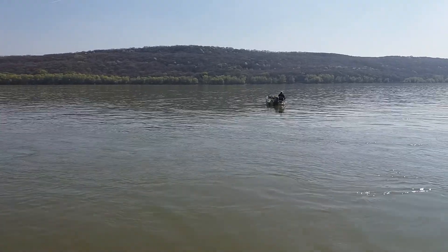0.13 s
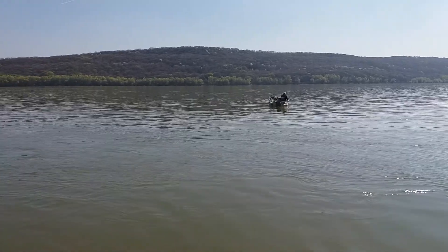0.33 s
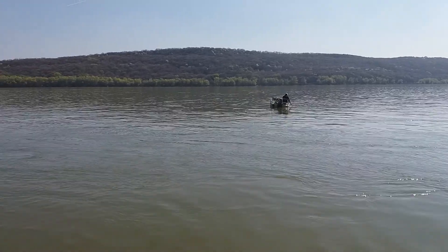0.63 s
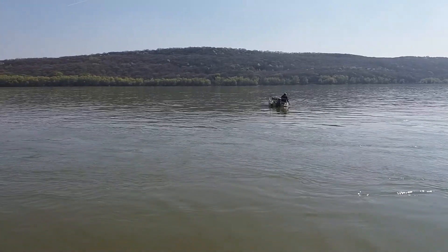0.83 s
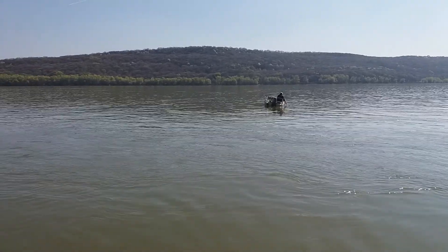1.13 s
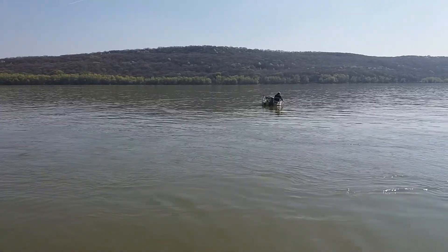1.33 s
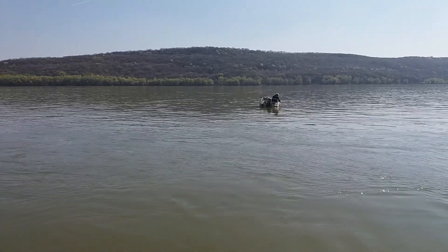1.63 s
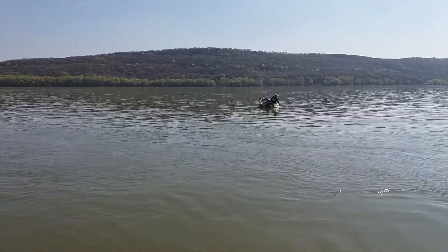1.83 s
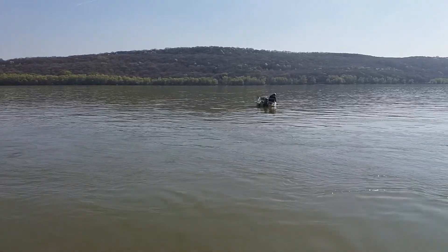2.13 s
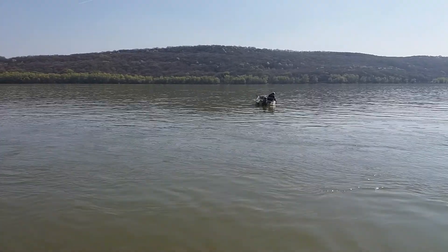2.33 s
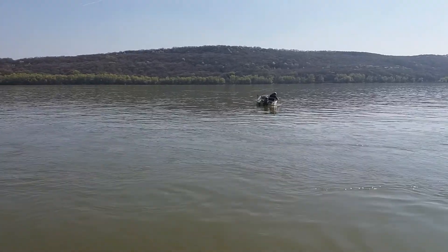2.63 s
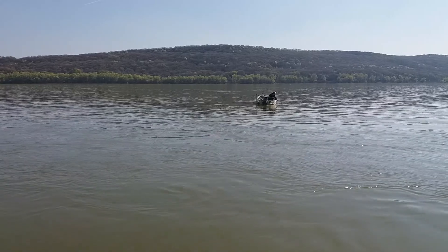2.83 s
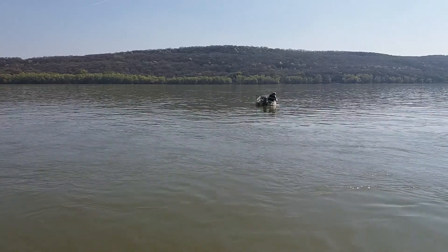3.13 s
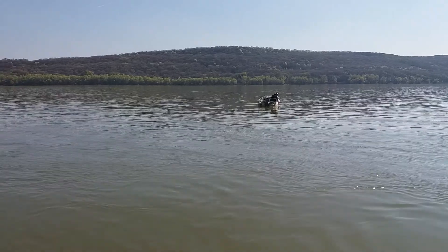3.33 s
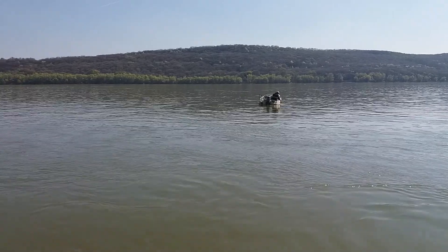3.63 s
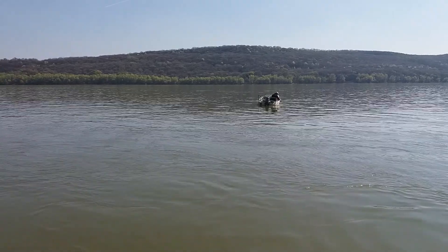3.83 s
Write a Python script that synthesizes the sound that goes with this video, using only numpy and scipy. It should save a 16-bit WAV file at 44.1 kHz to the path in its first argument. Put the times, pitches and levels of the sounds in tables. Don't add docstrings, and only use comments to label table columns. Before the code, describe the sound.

Quiet open river with faint low buzzing pulses and tiny drips; a distant finch starts singing, then two deep watery plops ring out and echo. Afterwards small bubbles crackle near the microphone, with slight hiss.

```python
import sys
import numpy as np
from scipy import signal
from scipy.fft import rfft, irfft, next_fast_len
from scipy.io import wavfile
from scipy.ndimage import map_coordinates

SR = 44100
rng = np.random.default_rng(int(sys.argv[2]) if len(sys.argv) > 2 else 0)


def nominal_scale(level):
    x = np.asarray(level, float) / 20
    return 10 ** x


def unload_wav(signal):
    wavfile.write(
        sys.argv[1],
        SR,
        np.round(np.clip(np.atleast_2d(signal).T, -1, 1) * 32767).astype(np.int16),
    )


N = 176400


def unit(x):
    return x / np.sqrt(np.mean(x ** 2) + 1e-20)


def along(points, hz):
    f, value = np.transpose(points)
    return np.interp(np.log(hz + 1), np.log(f + 1), value)


def wobble(rate):
    knots = rng.standard_normal(int(N * rate / SR) + 4)
    return map_coordinates(knots, [np.arange(N) * rate / SR])


def filtered(x, response):
    size = next_fast_len(len(x) + SR // 2)
    spectrum = rfft(x, size) * response(np.fft.rfftfreq(size, 1 / SR))
    return irfft(spectrum, size)[:len(x)]


def noise(spectrum, size):
    return unit(filtered(rng.standard_normal(size), lambda hz: nominal_scale(along(spectrum, hz))))


def add(track, s, sound):
    part = track[max(round(s * SR), 0):][:len(sound)]
    part += sound[:len(part)]


# f/Hz, time to fall 60 dB [s]
VALLEY_RING = [(100, 1.4), (300, 1.97), (1000, 2.4), (4000, 3.3), (10000, 0.24)]


def tail(x, start_s, dryness=1):
    hz, t, z = signal.stft(rng.standard_normal(int(1.5 * SR)), SR, nperseg=1024)
    fade = nominal_scale(-60 * dryness * t / along(VALLEY_RING, hz)[:, None])
    reply = signal.istft(z * fade, SR, nperseg=1024)[1]
    delayed = np.pad(x, (int(start_s * SR), 0))
    return signal.fftconvolve(delayed, reply / np.linalg.norm(reply))[:N]


def air_pocket(start_hz, end_hz, db, length, attack, steep):
    glide_s = 0.013
    t = np.arange(SR // 10) / SR
    turns = end_hz * t - (end_hz - start_hz) * glide_s * (1 - np.exp(-t / glide_s))
    swell = (1 - np.exp(-t / attack)) * np.exp(-(t / length) ** steep)
    return nominal_scale(db) * swell * np.sin(2 * np.pi * turns)


# t/s, start f/Hz, end f/Hz, peak level/dB, length/s
POCKETS = [
    (1.9469, 266, 338, -14.5, 0.0056),
    (3.1199, 190, 350, -19, 0.012),
]
# attack/s, steepness of the fade, push (negative opens with suction)
POCKET_ATTACK_S = [0.0023, 0.00076]
POCKET_STEEP = [2.47, 2.3]
POCKET_PUSH = [-1.04, 0.84]
# t/s, start f/Hz, end f/Hz, peak level/dB, length/s
HEAVES = [
    (1.9332, 89.5, 156, -24, 0.0231),
    (3.1175, 139, 149, -29, 0.012),
]
HEAVE_ATTACK_S = [0.023, 0.0028]
# t/s, start f/Hz, end f/Hz, peak level/dB, length/s
BUBBLES = [
    (1.955, 346, 431, -24.5, 0.011),
    (3.139, 315, 481, -31.5, 0.013),
]
# t/s, start f/Hz, end f/Hz, peak level/dB, length/s
SIDE_BUBBLES = [
    (1.949, 870, 1070, -43.5, 0.0064),
    (3.1198, 874, 800, -31, .011),
    (1.931, 1040, 2260, -38, 0.0038),
    (3.107, 450, 610, -42, 0.0028),
]
# t/s, crack level/dB, spray level/dB
SLAPS = [
    (1.9311, -44, -60),
    (1.947, -51, -52),
    (3.108, -47.5, -58),
    (3.12, -55, -49.5),
]
# f/Hz, level/dB
SPRAY = [(300, 11.5), (800, 7), (2000, 8), (4000, -10), (8000, -20), (15000, -31)]
# delay t/s, level/dB
ECHOES = [
    [(.064, -30), (.094, -16.5), (.105, -21.5), (.168, -24.5), (.245, -25), (.294, -26), (.342, -24.5),
     (.425, -31.5)],
    [(.088, -19.5), (.11, -16.5), (.177, -23.5), (.248, -31)],
]
# bass limit of the far sound f/Hz, valley level/dB, dryness of the valley
BANK_LOW_HZ = [418, 171]
VALLEY_DB = [-15.5, -17.5]
VALLEY_DRYNESS = [.95, 1.25]


def slap(crack_db, spray_db):
    crack_t60, spray_t60, attack_s = 0.049, 0.2, 0.0012
    t = np.arange(SR // 5) / SR
    level = nominal_scale(crack_db - 60 * t / crack_t60) + nominal_scale(spray_db - 60 * t / spray_t60)
    return level * (1 - np.exp(-t / attack_s)) * noise(SPRAY, size=len(t))


def bank_answer(far, k):
    lumps_db = 3 * np.tanh(wobble(22.0))
    out = nominal_scale(VALLEY_DB[k] + lumps_db) * tail(far, 0.042, VALLEY_DRYNESS[k])
    dull = filtered(far, lambda hz: 1 / (1 + 1j * hz / 1500))
    for delay, db in ECHOES[k]:
        add(out, delay, nominal_scale(db) * dull)
    return out


def paddle():
    out = np.zeros(N)
    bubble_attack_s, side_echo_db = 0.0017, -7
    for k in range(2):
        dry, side = np.zeros(N), np.zeros(N)
        pocket = air_pocket(*POCKETS[k][1:], POCKET_ATTACK_S[k], steep=POCKET_STEEP[k])
        add(dry, POCKETS[k][0], POCKET_PUSH[k] * pocket)
        add(dry, HEAVES[k][0], air_pocket(*HEAVES[k][1:], HEAVE_ATTACK_S[k], steep=1.8))
        add(dry, BUBBLES[k][0], air_pocket(*BUBBLES[k][1:], bubble_attack_s, steep=1.34))
        for s, *bubble in SIDE_BUBBLES[k::2]:
            add(side, s, air_pocket(*bubble, bubble_attack_s, steep=2.5))
        for s, crack_db, spray_db in SLAPS[2 * k:2 * k + 2]:
            add(dry, s, slap(crack_db, spray_db))
        far = filtered(dry + nominal_scale(side_echo_db) * side,
                       lambda hz: 1 / (1 + BANK_LOW_HZ[k] / (1j * hz + 1e-3)))
        out += dry + side + bank_answer(far, k)
    return out


# f/Hz, level/dB
THROAT = [(1900, -2), (2350, -3), (2800, -7), (3200, 1), (3550, 1), (3950, -8), (4550, -7), (5300, -8)]


def note(shape, db, low_hz=0, span=1, quaver=.017, stretch=1):
    s, pitch, level = np.transpose(shape)
    t = np.arange(s[0], s[-1], 1 / SR / stretch)
    shake = map_coordinates(rng.standard_normal(60), [(t - s[0]) * 300])
    hz = low_hz + span * np.interp(t, s, pitch)
    tone = np.sin(2 * np.pi * np.cumsum(hz * (1 + quaver * shake)) / SR)
    soft_ends = signal.windows.tukey(len(t), .2)
    return nominal_scale(db + np.interp(t, s, level) + along(THROAT, hz)) * soft_ends * tone


# t/s, level/dB, bottom f/Hz, top f/Hz, stretch
VEES = [(1.325, -66, 3100, 5000, .85), (1.465, -64, 2950, 4850, .9), (1.604, -63, 2900, 4750, .93),
        (1.748, -62, 2850, 4550, .95), (1.89, -62, 2800, 4550, .98), (2.035, -61, 2700, 4500, 1.01),
        (2.183, -61, 2600, 4500, 1.05)]
# t/s, share of the span, level/dB
VEE = [(0, 1.25, -1), (.007, .46, 0), (.016, .28, 2), (.03, 0, -2), (.045, .27, 2), (.056, .5, 1),
       (.069, .97, -1), (.088, 1.01, -6)]
# t/s, level/dB, pitch factor
FALLS = [(2.31, -67.5, 0.89), (2.393, -64, 0.96), (2.478, -65.5, 1.04), (2.564, -64.5, 1.02),
         (2.648, -63.5, 1.0), (2.735, -68, 1.0)]
# t/s, f/Hz, level/dB
FALL = [(0, 3580, -10), (.012, 2994, -7.5), (.024, 2700, 8.5), (.032, 2434, 2.5), (.04, 2100, 4.5),
        (.047, 2000, -5)]
# t/s, f/Hz, level/dB
FLOURISH = [(2.888, 2900, -64), (2.896, 3300, -62.5), (2.912, 3500, -65.5), (2.93, 3300, -66.5),
            (2.95, 2950, -63), (2.968, 2550, -63), (3.0, 2200, -63), (3.03, 2100, -73)]
# t/s, length/s, f/Hz, level/dB
WHISTLES = [
    (.3, .065, 4270, -75),
    (.51, .17, 4230, -81),
    (1.115, .09, 5500, -86),
    (1.245, .06, 5500, -86),
    (2.28, .04, 4050, -71),
]


def birds():
    finch, whistles = np.zeros(N), np.zeros(N)
    for s, db, low_hz, top_hz, stretch in VEES:
        add(finch, s, note(VEE, db, low_hz, top_hz - low_hz, stretch=stretch))
    for s, db, factor in FALLS:
        add(finch, s, note(FALL, db, span=factor))
    add(finch, FLOURISH[0][0], note(FLOURISH, 0, quaver=.03))
    for s, length, hz, db in WHISTLES:
        path = [(0, .94 * hz, 0), (.008, hz, 0), (length, hz, -5)]
        add(whistles, s, note(path, db + 10, quaver=0.0083))
    wood = tail(finch + nominal_scale(-4) * whistles, 0.0037, dryness=1.6)
    flutter = nominal_scale(2 * wobble(150))
    return (finch + whistles) * flutter + nominal_scale(-5 + 1.5 * wobble(39.99)) * wood


def droplet(db, hz, cycles, glide=0.056):
    u = np.arange(int(2 * cycles * SR / hz)) * hz / SR / cycles
    level = nominal_scale(db - 24.5 * u) * (1 - np.exp(-u / 0.062))
    return level * np.sin(2 * np.pi * cycles * u * (1 + glide * u))


# t/s, peak level/dB, f/Hz, cycles, pitch glide
DRIPS = [(0.2129, -52.5, 2040, 18, .05), (1.3884, -58, 2430, 21, .05), (2.059, -48.5, 2260, 19, .05),
         (2.1845, -48, 1510, 5.1, 0.13), (2.596, -56, 1120, 13.5, .2), (2.7963, -39, 2340, 22.5, .01),
         (2.82, -54, 2400, 6.8, -0.0075), (2.821, -53.5, 1710, 33, -.1), (2.9164, -55.5, 1395, 35, .2),
         (2.953, -60, 1070, 16, 0.034), (2.9642, -48, 2600, 13, .01), (3.6162, -58, 2160, 25, .03),
         (3.63, -52.5, 2020, 22, -0.0073), (3.7735, -53, 1640, 28, 0.01), (.9394, -62, 2190, 20, .02),
         (1.286, -60, 2750, 22, 0.00082), (.583, -59, 760, 17, .05), (3.4094, -55, 1000, 10, 0.033),
         (3.78, -56, 3460, 6, 0.055), (3.921, -58, 1540, 26, 0.0081), (3.921, -57, 2200, 8.7, .02),
         (3.9414, -57, 2700, 22, -.03), (3.951, -57, 1450, 12, .03), (3.9614, -54, 1440, 23, 0.049),
         (3.961, -51, 2190, 7, -0.0026)]
# t/s, peak level/dB, f/Hz
SPECKS = [(0.245, -56, 1750), (0.377, -69, 953), (0.407, -69, 636), (0.571, -57.5, 593),
          (0.631, -65, 619), (0.691, -65, 1560), (0.709, -52, 2100), (0.764, -56.5, 2200),
          (0.962, -64, 662), (1.031, -62, 1630), (1.272, -59, 2760),
          (3.3906, -53.5, 2120), (3.428, -53, 1460), (3.445, -57, 1610), (3.4704, -53, 2150),
               (3.491, -58, 2440), (3.5038, -54, 1920), (3.5352, -60, 964), (3.5936, -62, 1690)]
# t/s, peak level/dB, f/Hz
PIPS = [(2, -58, 1700), (3.3, -60, 5900), (3.898, -69, 4400), (3.491, -66, 5000), (2.4, -63, 2400),
        (3, -61, 5200), (3.3536, -57.5, 4700), (3.5493, -58, 4400), (2.1, -65, 3900)]
# t/s, peak level/dB, f/Hz
TICKS = [(2.128, -62, 8100), (2.163, -62, 7950), (2.341, -57, 8400), (2.4972, -59, 8100),
         (2.5217, -58, 7920), (2.6554, -64, 8800), (2.7457, -58.5, 7860), (2.8814, -59, 7870),
         (3.0465, -61, 7950), (3.3062, -61, 7980), (3.5014, -61, 8250), (3.7807, -59, 9300),
         (3.781, -59, 7500), (3.661, -64, 7400), (3.8851, -63, 8030)]
TICK_CYCLES = 18.5


def drips():
    out = np.zeros(N)
    for s, *drip in DRIPS:
        add(out, s, droplet(*drip))
    for s, db, hz in SPECKS:
        add(out, s, droplet(db - 1.5, hz, 13.6))
    for rows, cycles in ((PIPS, 32), (TICKS, TICK_CYCLES)):
        for s, db, hz in rows:
            add(out, s, droplet(db, hz, cycles))
    return out


def scatter(count, from_s, db, spread_db, middle_hz, spread, cycles):
    out = np.zeros(N)
    for when, luck, pitch in rng.random((count, 3)):
        s = from_s + when * (N / SR - from_s)
        level = db - spread_db * np.log(1 - .85 * luck)
        add(out, s, droplet(level, middle_hz * spread ** (pitch - .5), cycles))
    return out


def babble():
    stirred_s = 1.9
    steady = scatter(int(110 * N / SR), 0, -68, 2, 2183, 5.28, 14)
    fizz = scatter(110, stirred_s, -72, 2, 6800, 2.3, TICK_CYCLES)
    crackle = scatter(160, stirred_s, -64, 2, 3200, 6, 4)
    return steady + fizz + crackle


# t/s, start f/Hz, end f/Hz, peak level/dB, length/s
HULL_KNOCK = (.585, 115, 90, -54, .04)


def hull_knock():
    out = np.zeros(N)
    add(out, HULL_KNOCK[0], air_pocket(*HULL_KNOCK[1:], 0.011, steep=3.9))
    return out


BURSTS = (0, 51, 67)


def phone():
    frame_s, slot_s, start_s, cycle = .120 / 26, 0.00065, .1833, 102
    top_hz, low_hz = 640, 95
    sag_hz, sag_width_hz, sag = 183, 67, 1.66
    frame = (np.arange(N) / SR - start_s + slot_s / 2) / frame_s
    active = np.isin(np.floor(frame) % cycle, np.add.outer(BURSTS, np.arange(4)))
    on = active * (frame % 1 < slot_s / frame_s)

    def leak(hz):
        shape = 1 / (1 + 1j * hz / top_hz) ** 2 / (1 + low_hz / (1j * hz + 1e-3))
        width = 1j * hz * sag_width_hz
        supply = 1 + sag * width / (sag_hz ** 2 - hz ** 2 + width)
        return shape * supply

    return -nominal_scale(-51) * filtered(on * 1., leak)


# f/Hz, level/dB per Hz
AIR = [(150, -25), (250, -6), (347, -1.5), (403, -5), (658, -5.5), (734, -7), (2340, -9.5), (6500, -23.5),
       (8450, -44), (14300, -120)]
# f/Hz, level/dB per Hz
RUMBLE = [(15, -39), (30, -24.5), (60, -0.5), (90, -5), (170, -9.5), (300, -19), (600, -64)]


def background():
    air_db = -69.5 + 0.85 * wobble(0.91) + 0.31 * np.tanh(wobble(14))
    rumble_db = -66.5 + 0.78 * wobble(2.84) + 1.5 * np.tanh(wobble(17))
    return nominal_scale(air_db) * noise(AIR, size=N) + nominal_scale(rumble_db) * noise(RUMBLE, size=N)


def scene():
    return (paddle() + birds() + drips() + babble() + hull_knock() + background())[None]


def roll_off(x):
    return signal.sosfilt(signal.butter(12, 15900, fs=SR, output="sos"), x)


# f/Hz, level/dB per Hz
HISS = [(3000, -7.5), (5500, -25), (7200, -6.5), (8100, -2.5), (9000, -5), (11000, -4.5), (14000, -1.5),
        (15800, -1)]


def record(dry):
    mic_low_hz, hiss_db, offset = 58, -75.5, -.0004
    mic = filtered(dry[0], lambda hz: 1 / (1 + mic_low_hz / (1j * hz + 0.00091)) ** 2)
    mix = mic + phone() + nominal_scale(hiss_db) * noise(HISS, size=N) + offset
    return roll_off(mix[None])


dry = scene()
out = record(dry)
unload_wav(out)
```